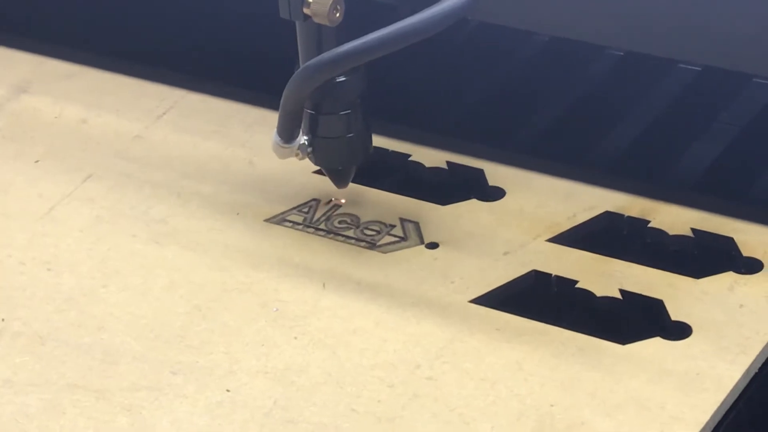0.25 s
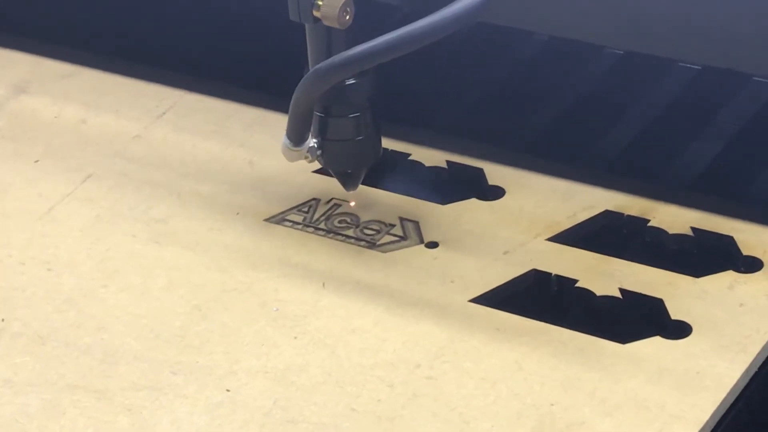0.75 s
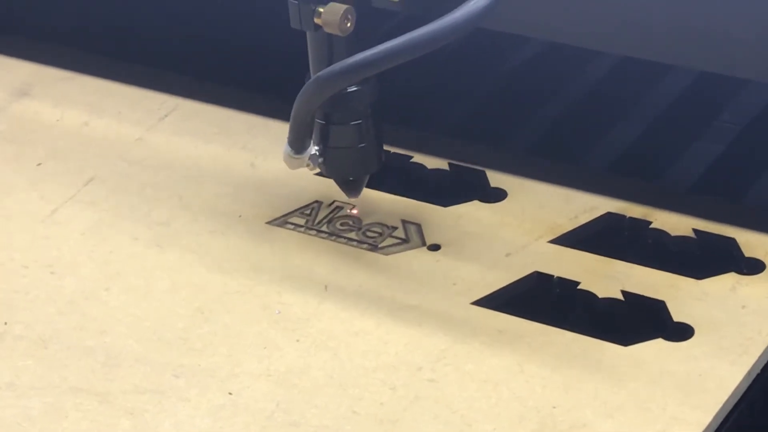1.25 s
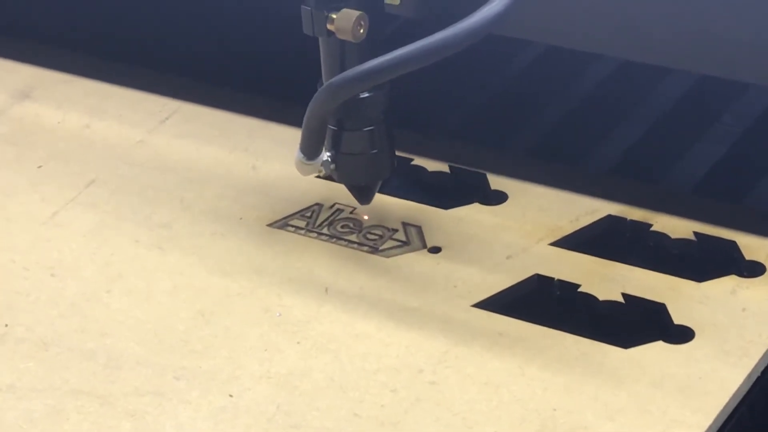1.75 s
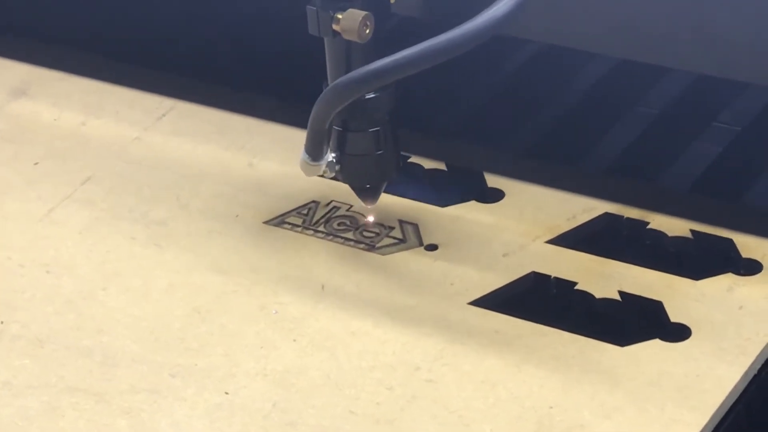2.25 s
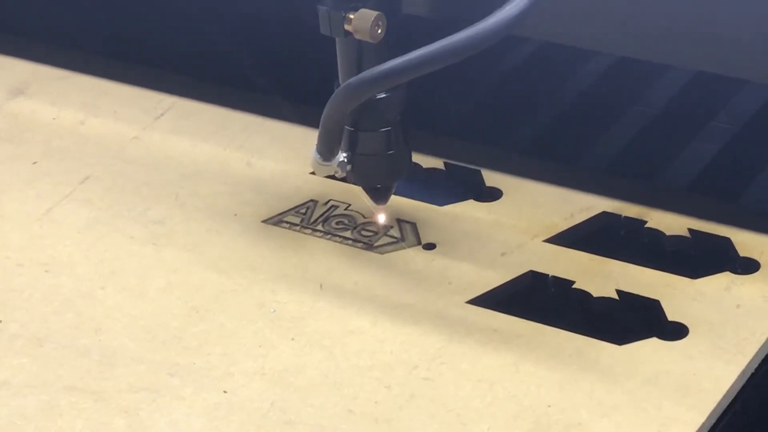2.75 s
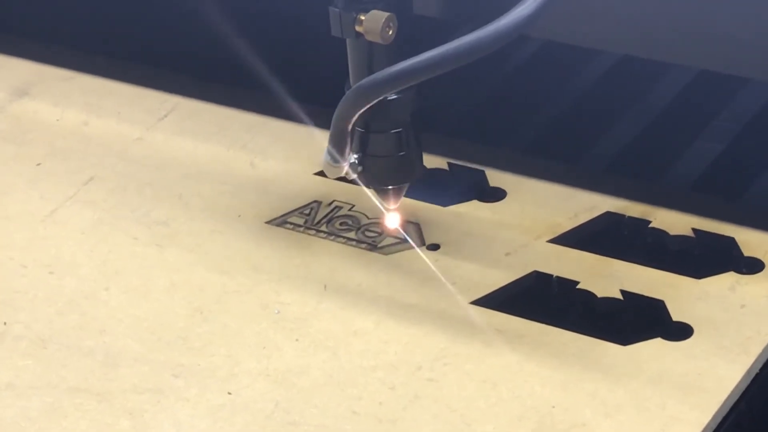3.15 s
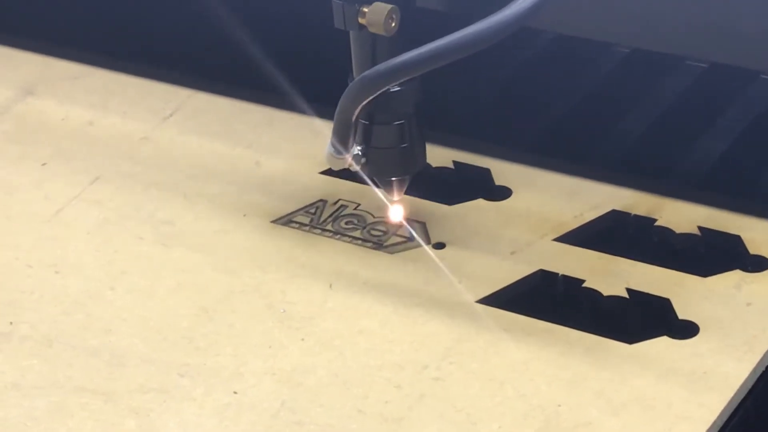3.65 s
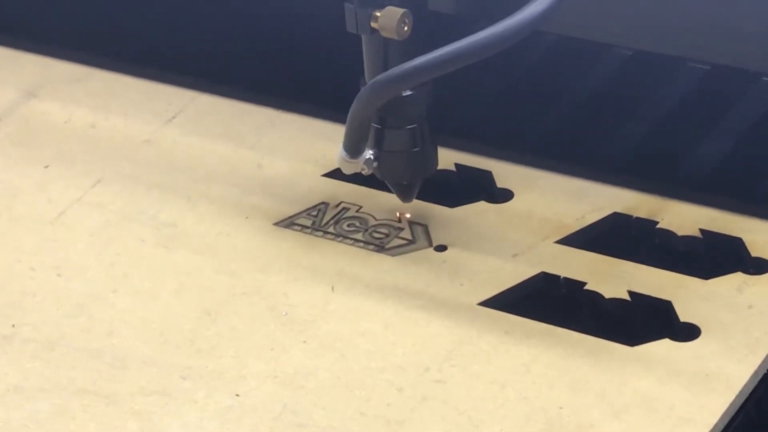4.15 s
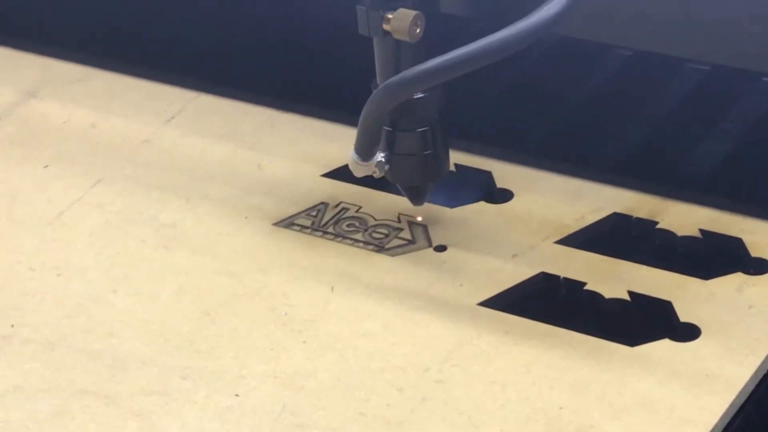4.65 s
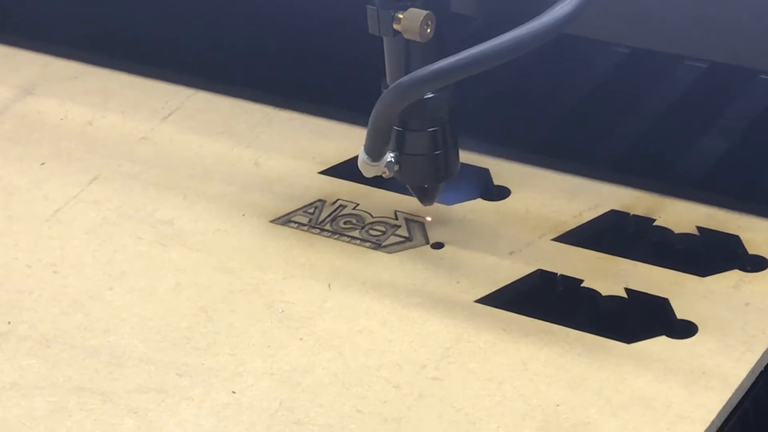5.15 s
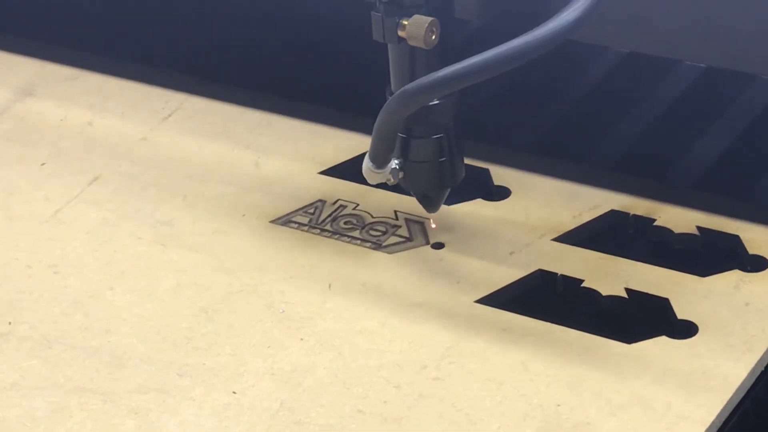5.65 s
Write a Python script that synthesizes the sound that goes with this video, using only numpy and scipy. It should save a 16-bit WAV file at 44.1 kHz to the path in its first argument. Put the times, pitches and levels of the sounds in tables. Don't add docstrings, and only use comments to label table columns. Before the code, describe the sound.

A continuous machine drone in a room: one unwavering fan tone dominates, beneath it rumbling air surges irregularly several times a second and a pump hums. A thin, boxy hiss of compressed air sits far lower in level, with faint whistly colouring and gentle sizzling lifts during burning strokes. The small nearby microphone sounds thin in the deepest bass and dull at the very top.

```python
import sys
import numpy as np
from scipy import signal
from scipy.fft import rfft, irfft, next_fast_len
from scipy.io import wavfile
from scipy.ndimage import uniform_filter1d, map_coordinates

SR = 44100
rng = np.random.default_rng(int(sys.argv[2]) if len(sys.argv) > 2 else 0)


def to_wav(s):
    ch = np.atleast_2d(s).T
    pcm = np.round(np.clip(ch, -1, 1) * 32767)
    wavfile.write(sys.argv[1], SR, pcm.astype(np.int16))


def makeup_ratio(level_db):
    decades = np.asarray(level_db, float) / 20
    return 10 ** decades


N = 260631
T = np.arange(N) / SR

SHAFT_HZ, MAINS_HZ = 59.32, 59.99
WHIRR_DB, WHIRR_DRIFT_DB = -59.5, 0.1
BOOM_DB, THROB_DB = -39.5, -38
CATCH_S, DIE_S = 0.1, 0.2
WHISTLE_DB, WHISTLE_FADE_DB_PER_S = -64, -0.61
SIZZLE_DB, SIZZLE_FADE_DB_PER_S = -65, -0.2

# (centre [Hz], width [Hz], level [dB])
DUCT_MODES = [(49, 13, -12.5), (63.7, 12, -11), (78.4, 6.5, -7.5), (97.3, 11, 1), (121.1, 6.4, -5.5),
              (136, 30, -4.5), (178.7, 15.2, -5), (207.3, 27.4, -7), (258, 33, -22), (314.4, 37, -17.5),
              (367, 42, -14.5), (422, 8.7, -21.5), (441, 9.4, -28), (481, 36, -28), (536, 40, -31.5),
              (596, 18, -31.5), (678, 17, -36)]
# (time [s], half length [s], level [dB])
BOOM_SURGES = [(.08, 0.11, -38), (.35, .07, -33.5), (.5, 0.055, -32.5), (.81, .15, -37), (1.14, 0.066, -35),
               (1.61, .17, -35), (2.05, .12, -40), (2.28, .06, -38.5), (2.56, 0.074, -37),
               (2.75, 0.056, -35), (3.05, .08, -37), (3.31, 0.14, -37), (3.703, .14, -38.5),
               (4.06, 0.064, -40), (4.29, 0.082, -38.5), (4.522, 0.061, -32), (4.738, 0.092, -32),
               (5.113, 0.06, -32), (5.3, .06, -35.5), (5.517, .09, -34), (5.832, .1, -33)]
# (time [s], half length [s], level [dB])
THROB_SURGES = [(.15, .1, -39.5), (.39, 0.076, -35), (.74, 0.11, -35.5), (1.19, 0.14, -33),
                (1.43, .06, -37.5), (1.59, .08, -37.5), (1.9, 0.07, -36.5), (2.11, 0.087, -35.5),
                (2.75, 0.1, -36.5), (3.4, 0.051, -37.5), (3.06, 0.028, -32), (3.21, 0.072, -33.5),
                (3.6, .05, -35), (4.05, 0.16, -34.5), (4.66, 0.066, -34.5), (4.85, 0.11, -41),
                (5.15, 0.13, -35), (5.47, 0.14, -37), (5.85, 0.068, -36)]
# (shaft multiple, level [dB rms])
BLOWER_ORDERS = [(1, -52), (2, -46), (3, -54), (4, -68), (5, -60.5), (6, -32.5), (7, -67), (9, -76),
                 (12, -55.4), (14, -81), (18, -73.6)]
# (centre [Hz], width [Hz], level [dB])
HOUSING_MODES = [(789, 27, -1), (834, 30, -4.5), (973, 17, -9.5), (1058, 16, 1.5), (1099, 37, 1),
                 (1154, 22, 2.5), (1188, 11, -4.5), (1234, 51, -0.5), (1366, 40, -11.5), (1448, 44, -13.5),
                 (1645, 53, -12.5), (1863, 79, -15)]
# (frequency [Hz], density [dB per Hz])
FLOW_SPECTRUM = [(13, -50.5), (22, -12.5), (106, -14.5), (198, -8.5), (272, -21), (357, -15), (435, -22.5),
                 (644, -25), (711, -22.5), (882, -29.5), (2400, -47), (3120, -78.5), (5280, -120)]
# (mains multiple, level [dB rms])
PUMP_ORDERS = [
    (1, -45.5),
    (2, -56),
    (5, -67),
]
# (time [s], half length [s], centre [Hz], width [Hz], level [dB rms])
KERF_SWELLS = [
    (1.15, .3, 5800, 300, -78.5),
    (2.05, .35, 5800, 300, -79),
    (3.398, .2, 9300, 1500, -78),
    (4.8, 0.88, 3790, 60, -81.5),
    (5.6, .25, 6020, 150, -81),
]
# (centre [Hz], width [Hz], level [dB])
CABINET_MODES = [(2053, 51, -4.5), (2210, 26, 0), (2450, 22, -7), (2888, 120, 2.5), (3160, 30, -3),
                 (3170, 27, -4), (3320, 50, -2), (3340, 25, -3.5), (3420, 28, -2.5), (3766, 90, 0),
                 (3960, 22, -4), (4070, 35, -4.5), (4170, 99, -2.5), (5260, 50, -7), (5590, 60, -3.5),
                 (5660, 39, -8), (6020, 110, -3.5), (6480, 120, -6), (7220, 70, -7.5), (8650, 300, -13),
                 (9260, 300, -11.5), (9900, 350, -15), (11700, 250, -19.5), (12800, 270, -17),
                 (13700, 390, -19)]
# (frequency [Hz], density [dB per Hz])
JET_SPECTRUM = [(880, -8.5), (1500, 0), (1750, -7.5), (1880, -5), (2640, -4.5), (2860, -4.5), (3550, -6),
                (3830, -5.5), (4890, -10), (5840, -9.5), (7670, -15), (9510, -13), (10700, -16),
                (13300, -15.5), (15500, -16.5)]
# (time [s], level [dB])
HEAD_TRAVEL = [
    (0, -63),
    (.35, -65),
    (2.3, -63),
    (3.8, -63.5),
    (4.15, -66),
    (4.5, -65),
    (5.3, -66),
    (5.91, -65.3),
]
# (start [s], length [s], whistle lift [dB], sizzle lift [dB])
BURN_STROKES = [
    (-.3, 0.39, 3, 3.5),
    (.9, .5, 2.5, 1.5),
    (1.75, 0.68, 2, 1.2),
    (3.152, 0.38, 2.5, 3),
    (3.55, .47, 2.5, 1.3),
    (4.05, .35, 0, 1.2),
    (5.4, .6, 2.5, 1),
]


def unit(x):
    return x / np.sqrt(np.mean(x ** 2) + 1e-20)


def along(points, hz):
    f, v = np.transpose(points)
    return np.interp(np.log(hz + 1), np.log(f + 1), v)


def wobble(rate):
    return map_coordinates(rng.standard_normal(N // 1000), [T * rate])


def filtered(x, gain):
    size = next_fast_len(N + 8192)
    return irfft(rfft(x, size) * gain(np.fft.rfftfreq(size, 1 / SR)), size)[:N]


def below(hz, edge_hz, steepness):
    return 1 / (1 + (hz / edge_hz) ** steepness)


def resonant(modes, hz):
    power = 0
    for centre, width, db in modes:
        damping = (hz * width) ** 2
        peak = damping / ((centre * centre - hz * hz) ** 2 + damping)
        power = power + makeup_ratio(2 * db) * peak ** 2
    return np.sqrt(power)


def noise(gain):
    return unit(filtered(rng.standard_normal(N), gain))


def levelled(x, span_s):
    size = round(span_s * SR)
    power = uniform_filter1d(uniform_filter1d(x ** 2, size), size)
    return unit(x / np.sqrt(np.abs(power) + 0.01))


def swells(rest_db, surges):
    power = makeup_ratio(2 * rest_db)
    for s, half, db in surges:
        power = power + makeup_ratio(2 * db) * np.exp(-((T - s) / half) ** 2)
    return np.sqrt(power)


def orders(base_hz, table, unsteady_db):
    turn = 2 * np.pi * base_hz * T
    total = np.zeros(N)
    for multiple, db in table:
        level = np.sqrt(2) * makeup_ratio(db + unsteady_db * wobble(2.43))
        total += level * np.sin(round(multiple) * turn + rng.uniform(0, 7.1))
    return total


def duct():
    def region(low_hz, high_hz):
        return noise(lambda hz: resonant(DUCT_MODES, hz) * (1 - below(hz, low_hz, 16)) * below(hz, high_hz, 16))

    boom = swells(BOOM_DB, BOOM_SURGES) * levelled(region(69, 113), span_s=0.14)
    throb = swells(THROB_DB, THROB_SURGES) * levelled(region(116.3, 234), span_s=0.12)
    rest = noise(lambda hz: resonant(DUCT_MODES, hz) * (below(hz, 68.4, 16) + 1 - below(hz, 233, 16)))
    return boom + throb + makeup_ratio(-41.5) * rest


def blower():
    tones = orders(SHAFT_HZ, BLOWER_ORDERS, unsteady_db=0.25)
    whirr_level = makeup_ratio(WHIRR_DB + WHIRR_DRIFT_DB * wobble(2.5))
    whirr = whirr_level * noise(lambda hz: resonant(HOUSING_MODES, hz))
    flow = makeup_ratio(-46) * noise(lambda hz: makeup_ratio(along(FLOW_SPECTRUM, hz)))
    return tones + whirr + flow


def pump():
    return orders(MAINS_HZ, PUMP_ORDERS, unsteady_db=2.5)


def kerf():
    total = np.zeros(N)
    for s, half, centre, width, db in KERF_SWELLS:
        swell = makeup_ratio(db) * np.exp(-((T - s) / half) ** 2)
        total += swell * noise(lambda hz: resonant([(centre, width, 0)], hz))
    return total


def burning():
    lift = np.zeros((2, N))
    for start, length, whistle_db, sizzle_db in BURN_STROKES:
        catch = (T - start) / CATCH_S
        die = (start + length - T) / DIE_S
        lift += np.outer([whistle_db, sizzle_db], np.clip(np.minimum(catch, die) + 0.5, 0, 1))
    return lift


def standing_waves(x, depth_db, wide_hz, slow_s):
    hz, t, z = signal.stft(x, SR, nperseg=2048)
    knots = rng.standard_normal((1000, 100))
    field = map_coordinates(knots, np.meshgrid(hz / wide_hz, t / slow_s, indexing="ij"))
    return unit(signal.istft(z * makeup_ratio(depth_db * field), SR, nperseg=2048)[1][:N])


def nozzle():
    def colour(hz):
        return makeup_ratio(along(JET_SPECTRUM, hz) - 2) + 0.5 * resonant(CABINET_MODES, hz)

    steady = noise(colour)
    moving = standing_waves(noise(colour), depth_db=3, wide_hz=49.92, slow_s=0.51)
    hiss = unit(0.6 * steady + moving)
    low = filtered(hiss, lambda hz: below(hz, 4700, 12))
    high = filtered(hiss, lambda hz: 1 - below(hz, 7500, 12))
    middle = hiss - low - high

    whistle_lift, sizzle_lift = burning()
    jet = makeup_ratio(np.interp(T, *np.transpose(HEAD_TRAVEL))) * low
    whistle = makeup_ratio(WHISTLE_DB + WHISTLE_FADE_DB_PER_S * T + whistle_lift) * middle
    sizzle = makeup_ratio(SIZZLE_DB + SIZZLE_FADE_DB_PER_S * T + sizzle_lift) * high
    stroke = makeup_ratio(0.5 * np.sin(2 * np.pi * MAINS_HZ * T))
    flutter = makeup_ratio(2.5 + 0.31 * wobble(13))
    return flutter * stroke * (jet + whistle + sizzle)


def scene():
    return (duct() + blower() + pump() + kerf() + nozzle())[None]


def roll_off(x):
    return signal.sosfilt(signal.butter(12, 15780, fs=SR, output="sos"), x)


def record(dry):
    def microphone(hz):
        port = 1 - 0.27 / (1 + ((hz - 10400) / 150) ** 2)
        bass_cut = hz ** 4 / (hz ** 4 + 29 ** 4)
        return port * bass_cut

    return roll_off(filtered(dry[0], microphone)[None])


dry = scene()
out = record(dry)
to_wav(out)
```